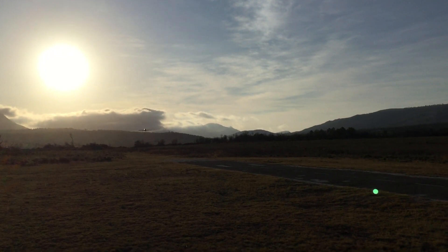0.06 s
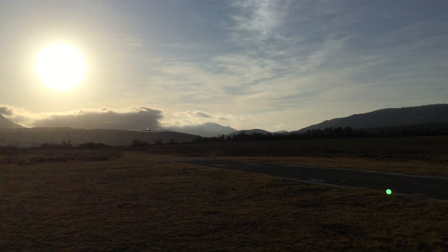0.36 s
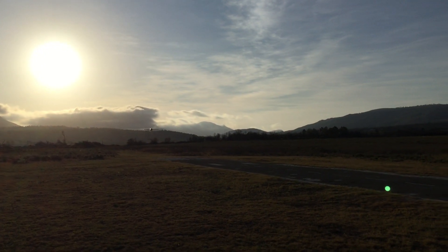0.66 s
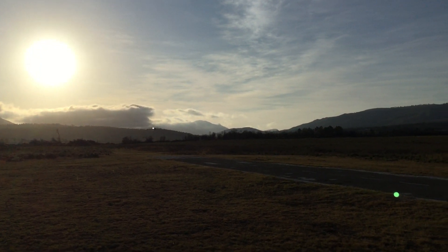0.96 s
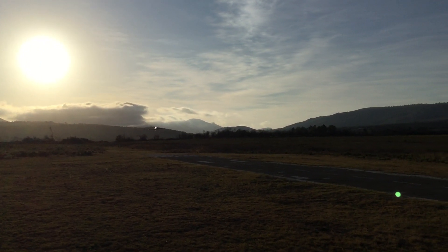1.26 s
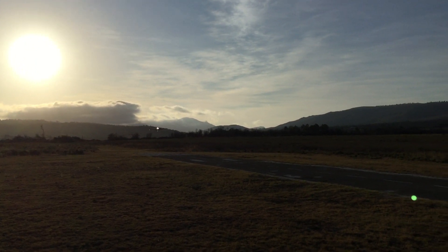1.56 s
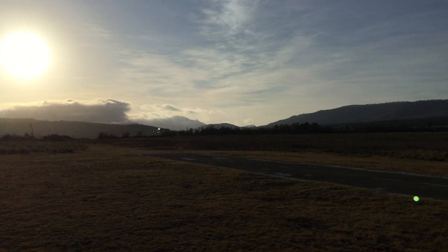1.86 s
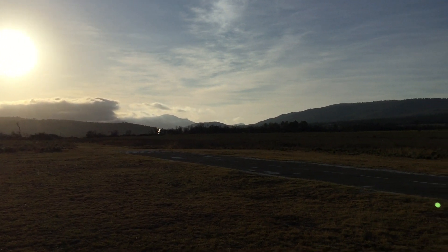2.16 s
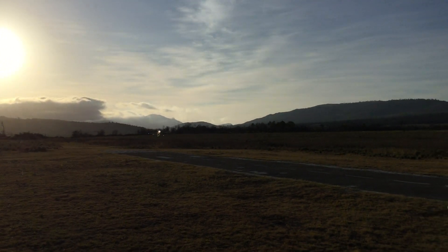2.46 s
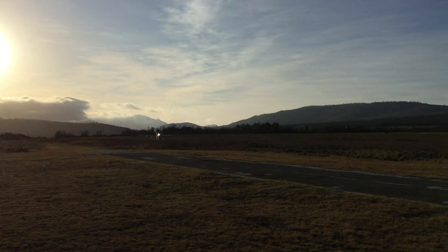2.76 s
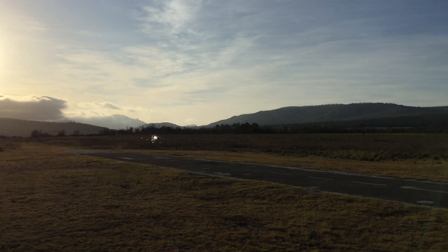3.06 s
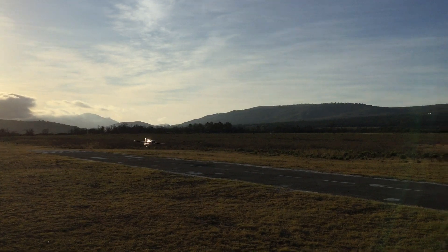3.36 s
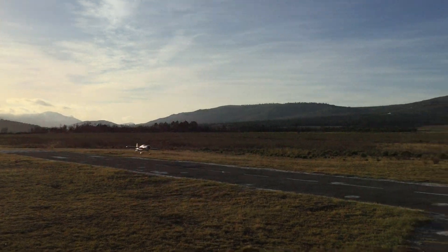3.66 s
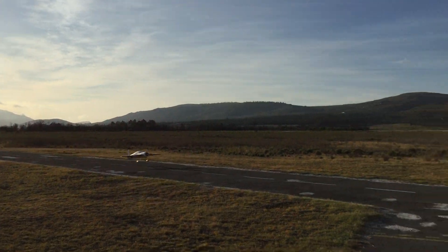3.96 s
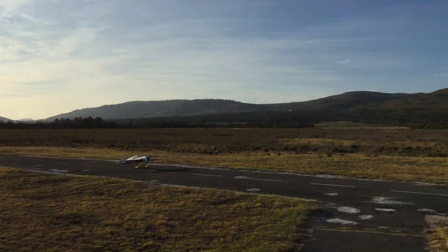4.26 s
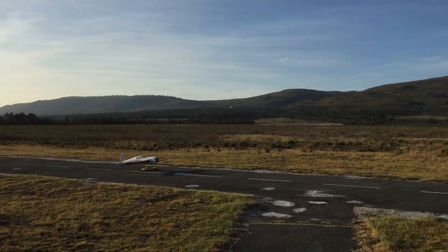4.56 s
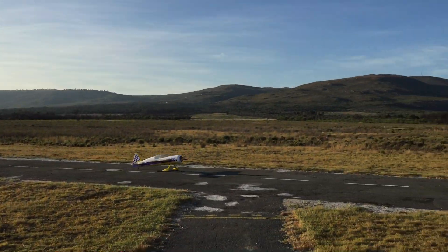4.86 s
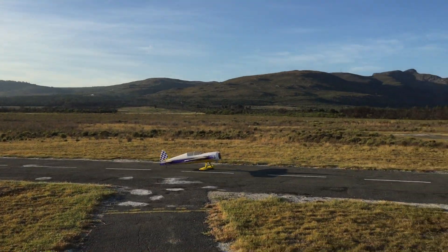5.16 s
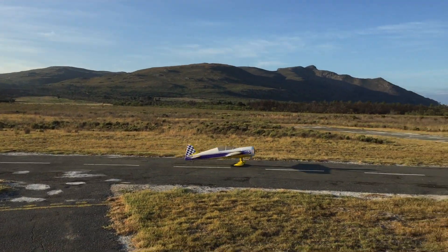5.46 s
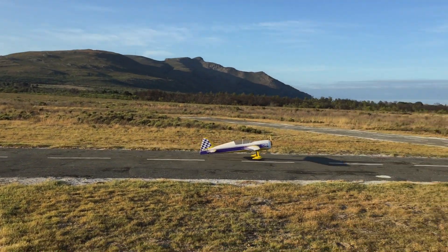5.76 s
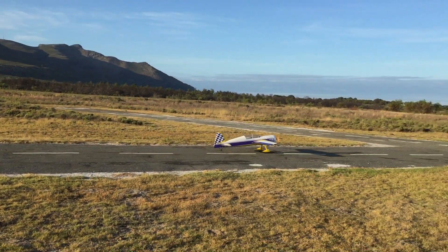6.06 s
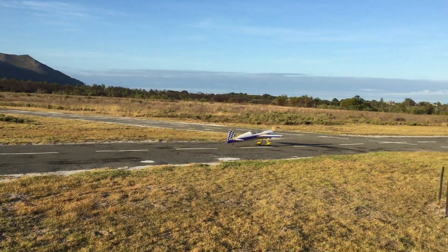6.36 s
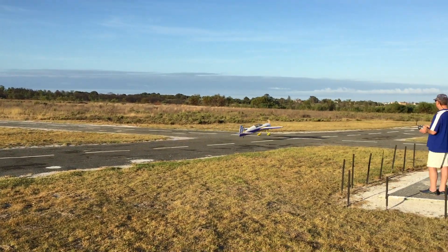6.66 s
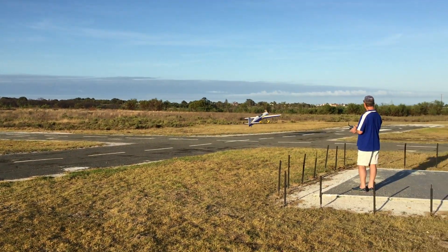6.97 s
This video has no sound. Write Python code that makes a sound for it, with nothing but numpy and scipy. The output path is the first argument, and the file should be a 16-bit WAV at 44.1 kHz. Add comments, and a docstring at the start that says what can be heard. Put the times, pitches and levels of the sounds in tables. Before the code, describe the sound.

A large model aeroplane glides in over an open airstrip, its two-stroke engine idling. At first it is fairly distant: a soft, rapid puffing, interrupted by irregular sharper pops with a tinny ring, over a faint propeller hiss. From about 2.5 seconds the idle slows a little and takes on a hollow knock, while the plane keeps getting closer and louder. The pops become crisper from around 3.5 seconds and are strong by 5. Small wheels rattle lightly on rough asphalt from about 5 seconds, fading after 6. At about 5.6 seconds the throttle opens and the sputter turns into a loud, raspy buzz that climbs steeply in pitch. The plane passes nearest the microphone just after 6 seconds. By 6.6 seconds the engine holds a steady high note, its tone shifting and wavering slightly as it begins climbing away, until about 7 seconds.

```python
"""A two-stroke engine puffs and barks at idle as a large model aeroplane glides in.
Most turns of the crank only puff through the silencer; a few fire hard. The plane skims the runway,
wheels rattling, passes the listener and opens up to climb away, firing on every turn.
The exhaust changes colour from nose-on to tail-on; the propeller's hiss is combed by its ground
reflection."""
import sys
import numpy as np
from scipy import signal
from scipy.fft import rfft, irfft
from scipy.io import wavfile
from scipy.ndimage import uniform_filter1d

SR = 44100
rng = np.random.default_rng(int(sys.argv[2]) if len(sys.argv) > 2 else 0)


def master(y):
    """Save y as 16-bit WAV."""
    cut = np.clip(np.atleast_2d(y).T, -1, 1)
    pcm = np.round(cut * 32767)  # scale
    wavfile.write(sys.argv[1], SR, pcm.astype(np.int16))


N = 317961
TIME = np.arange(N) / SR
THROTTLE_OPENS_S, SPOOL_S = 5.58, 0.3

# Each row: time in seconds, heard crank speed in Hz.
IDLE_SPEED = [(0.0, 44.9), (2.48, 43.5), (3.24, 37.9), (3.89, 38.0), (4.33, 35.5), (4.91, 35.0),
              (5.14, 35.3), (5.46, 41.0), (5.54, 41.3)]
POWER_SPEED = [(5.6, 49.8), (5.698, 58.3), (5.798, 67.5), (5.872, 71.1), (5.996, 75.3), (6.308, 84.1),
               (6.466, 100.2), (6.502, 103.7), (6.648, 109.9), (7.15, 110.2)]
def crank(bark_s):
    """Start and speed of each turn, the turns that bark, and the running turn count."""
    speed_hz, = curve(list(IDLE_SPEED) + list(POWER_SPEED), TIME)
    turns = np.cumsum(speed_hz) / SR
    # bend the count so each bark falls on a whole turn
    at_bark = np.interp(bark_s, TIME, turns)
    barking = np.cumsum(np.maximum(np.round(np.diff(at_bark, prepend=0)), 1))
    turns += np.interp(TIME, bark_s, barking - at_bark)
    times = np.interp(np.arange(int(turns[-1]) + 1), turns, TIME)
    return times, np.interp(times, TIME, speed_hz), barking.astype(int), turns


def idling(times, speed_hz, barking, idle_hz=39.75, eased_s=2.3):
    """Throttle shut: fresh charges pop, stale ones puff. Returns silencer drive and direct sound."""
    fresh_scatter, puff_scatter_db, chuff_scatter_db = scatter(times, .55, .8, 1.5)
    turn = np.arange(len(times))
    is_bark = np.isin(turn, barking)
    per_turn = np.sqrt(SR / speed_hz) * (times < THROTTLE_OPENS_S) * ~is_bark
    # burnt gas weakens the turn after a bark, the next is stronger; the seesaw dies away
    since_bark = turn - np.maximum.accumulate(is_bark * turn)
    fresh = (1 - 2 * (since_bark % 2)) * .8 ** (since_bark - 1.) + fresh_scatter
    eased = times > eased_s  # throttle eased back on the glide
    weak_db = -43 + spread_db(times) + 2.3851 * (speed_hz - idle_hz) - 3.5 * eased
    fire = per_turn * amp(weak_db + 2.4 * fresh)
    direct = puffs(times, per_turn * amp(puff_scatter_db), fresh)
    direct += chuffs(times, per_turn * amp(weak_db + chuff_scatter_db))
    direct += knocks(times, per_turn * eased, fresh)
    direct += can(times, fire * amp(-4.5))
    return band(pulses(times, fire), 1300, "low"), direct


# Each row: multiple of the puff pitch, decay in ms, level in dB.
PUFF_MODES = [(0.35, 3.2, -15), (1, 1.9, 0), (1.45, 2.8, -14)]
# Each row: time in seconds, pitch in Hz.
PUFF_PITCH = [(0.5, 160.6), (2.2, 175.7), (3.3, 219), (5.5, 225)]
# Each row: time in seconds, gain in dB.
PUFF_SWELL = [(0.8, -3), (1.7, 3), (2.8, 0.5), (3.7, 0.5), (4.9, -1), (5.4, -4)]
def puffs(times, sizes, fresh):
    """Unfired charges leave as round puffs that carry best abeam and thin as the engine picks up."""
    pitch_hz, = curve(PUFF_PITCH, times)
    swell_db, = curve(PUFF_SWELL, times)
    seesaw_db = 3.8 * np.interp(times, [2, 3.3], [.4, 1]) * fresh  # deeper at slow idle
    sizes = sizes * amp(-20.5 + spread_db(times, beaming=1.88) + swell_db - seesaw_db)
    return sum(rings(times + .0005, sizes * amp(db), ratio * pitch_hz, ms, order=3)
               for ratio, ms, db in PUFF_MODES)


# Each row: frequency in Hz, gain in dB.
CHUFF_COLOUR = [(350, -2), (520, 6), (900, -18), (1200, 0.5), (2000, -22)]
def chuffs(times, sizes):
    """The breathy edge of a puff carries only from close by."""
    level_db = -11.5 + np.interp(times, [1.5, 3.3, 4.6], [-8, 0, 5])
    breath = bursts(times, sizes * amp(level_db), rise_ms=.6, decay_ms=3.5)
    return coloured(breath, CHUFF_COLOUR, 560, 1000)


# Each row: frequency in Hz, gain in dB.
KNOCK_COLOUR = [(200, -8.5), (380, 0.5), (560, -1), (760, -15.5), (1300, -16), (2200, -24)]
def knocks(times, sizes, fresh):
    """At slow idle a fresh charge gives a hollow knock."""
    level_db = -32.5 + spread_db(times, beaming=1.46) + 4.9 * fresh
    strikes = pulses(times + .00093, sizes * amp(level_db))
    return -coloured(strikes, KNOCK_COLOUR, 300, 1000, bass_lag_ms=1.06)


# Each row: start in seconds, relative level in dB, extra crack and ping in dB.
BARKS = [(0.0197, -28.0, 0), (0.0412, -27.5, -2), (0.1064, -27.5, 3), (0.2395, -25.5, 0),
         (0.2835, -24.0, -1), (0.3714, -26.5, -3), (0.4154, -24.5, 0), (0.6357, -26.0, -1),
         (0.7923, -25.5, 1), (0.9943, -22.0, 2), (1.1288, -27.0, 2), (1.3118, -26.0, -2),
         (1.7416, -22.5, -2), (1.8085, -22.0, -2), (1.8752, -23.0, 1), (1.9659, -24.5, 1),
         (2.0571, -23.5, -1), (2.1248, -22.5, 2), (2.1929, -23.5, -1), (2.2611, -23.5, -2),
         (2.3291, -21.5, 5), (2.3975, -21.5, 0), (2.4665, -21.0, -2), (2.6046, -21.0, 1),
         (2.7229, -24.5, 0), (2.8939, -22.0, 1), (3.0953, -22.5, 3), (3.1998, -23.0, 1), (3.3058, -21.5, 2),
         (3.6238, -16.5, 4), (3.7551, -15.5, 2), (3.9915, -21.5, -7), (4.0988, -15.5, -1),
         (4.2905, -17.5, 1), (4.3748, -19.5, -1), (4.4867, -20.0, -4), (4.6014, -15.5, 4),
         (4.7173, -18.0, -1), (4.8042, -16.0, -1), (4.9824, -12.0, 2), (5.0991, -10.5, 0),
         (5.2116, -9.0, -3), (5.2655, -10.5, -2), (5.3182, -11.5, -1), (5.3955, -10.0, -1),
         (5.467, -14.0, 2), (5.5147, -10.5, 0), (5.5593, -8.5, 1), (5.6002, -9.0, 1), (5.6752, -9.0, -4),
         (5.8326, -9.5, 1), (5.9441, -7.5, 1), (6.0502, -12.5, 1), (6.1648, -9.5, 3)]
def barks(times):
    """A full charge fires. Returns a rough pulse as silencer drive, and the direct ping and gas crack."""
    _, level_db, sharp_db = np.transpose(BARKS)
    running_db = -9 * (times >= THROTTLE_OPENS_S)  # under throttle it only tops up a firing
    pulse_db = level_db + running_db
    crack_db = 4 + 1.61 * level_db + sharp_db + running_db / 3
    fire = amp(pulse_db + 12.5)
    tail = band(bursts(times, fire, rise_ms=1, decay_ms=14), 380, "high", order=1)
    gas = bursts(times + .00013, amp(crack_db), rise_ms=.5, decay_ms=2.6)
    cracks = coloured(gas, GAS_SIDE, 6000, 15000)
    # distant air dulls the cracks
    near = np.interp(TIME, [1.5, 3.3, 3.6], [.03, .2, .9])
    cracks = near * cracks + (1 - near) * amp(6) * band(cracks, 6500, "low")
    pings = can(times, amp(pulse_db + sharp_db + 13.5))
    return pulses(times, fire) + .27 * tail, pings + cracks


def throttled(times, speed_hz, barking, half_power_hz=82.7, misfire_db=-7, boom_db=.3):
    """Throttle open: every turn fires, more evenly at speed. Returns silencer drive and direct sound."""
    uneven = (60 / speed_hz) ** 2
    jitter_s, fire_scatter_db, gas_scatter_db = scatter(times, 1.5e-5, .9, 1.9)
    fired_s = times + uneven * jitter_s
    # the throttle leads the speed by the spool-up time
    lead_hz = SPOOL_S * uniform_filter1d(np.gradient(speed_hz, times), size=7)
    pull_hz = speed_hz + lead_hz - half_power_hz
    # a near misfire leaves its charge for the bark that follows
    misfires = np.isin(np.arange(len(times)), barking - 1)
    per_turn = np.sqrt(SR / speed_hz) * (times >= THROTTLE_OPENS_S) * amp(misfire_db * misfires)
    fire = per_turn * amp(-27.5 + .1348 * pull_hz + spread_db(times) + uneven * fire_scatter_db)
    pressure = pulses(fired_s, fire)
    boom = (amp(boom_db) - 1) * band(pressure, 230, "low", order=1)
    turbulence = band(bursts(fired_s, fire, rise_ms=.4, decay_ms=1.8), 2200, "high")
    gas = per_turn * amp(gas_scatter_db)
    jet_db = -38.5 + .0983 * pull_hz + spread_db(times, beaming=2.3)
    direct = gas_jet(fired_s, gas * amp(jet_db)) + shrill(fired_s + .00026, gas)
    return pressure + boom + .55 * turbulence, direct


# Each row: frequency in Hz, gain in dB.
EXHAUST_AHEAD = [(70, -10), (170, 12), (320, -13), (375, -2), (430, -5), (550, 8), (630, 7.5), (680, 5),
                 (725, 10.5), (800, -0.5), (980, 2), (1200, -7.5), (1700, -13), (2000, -17.5),
                 (2450, -24.5), (3000, -12), (3600, -27)]
EXHAUST_APPROACH = [(70, 1), (216, 7.5), (546, -3.5), (676, -7), (1260, -14), (1710, -10), (1940, 3.5),
                    (2330, -22.5), (2600, -30.5), (3380, -14), (4180, -21.5), (5000, -64)]
EXHAUST_ABEAM = [(50, -32), (72, 3.5), (102, 1), (150, 10.5), (230, 8), (330, 2.5), (430, 4), (560, -0.5),
                 (850, -3), (1150, -12), (1460, -39), (1900, -9), (2400, -31), (3400, -31), (4500, -38)]
# Each row: multiple of full crank speed, gain close by in dB, gain farther off in dB.
EXHAUST_ASTERN = [(1, 1.5, -1.5), (2, 2, -0.5), (3, -6, -8), (4, -29, -24.5), (5, -4, -9.5), (6, -12, -12),
                  (7, -7, -8), (8, -22.5, -21.5), (9, -1, -4.5), (10, -10, -15.5), (11, -6, -16),
                  (12, -18.5, -18)]
# Each row: multiple of full crank speed, gain in dB.
ASTERN_TREBLE = [(14, -37), (19.5, -20.5), (24, -23.5), (26.5, -27.5), (34, -28.5), (39, -33), (52, -42.5)]
# Times in seconds when one colour sounds alone: ahead, approach twice, abeam twice, close, farther off.
ASPECT_S = [1.7, 2.7, 3.7, 5.2, 6.3, 6.62, 7.051]
def exhaust(drive):
    """Pressure pulses ring the silencer, whose colour turns with the plane."""
    full_hz = POWER_SPEED[-1][1]
    treble = [(k * full_hz, db) for k, db in ASTERN_TREBLE]
    close = [(k * full_hz, db) for k, db, _ in EXHAUST_ASTERN] + treble
    farther = [(k * full_hz, db) for k, _, db in EXHAUST_ASTERN] + treble
    colours = EXHAUST_AHEAD, EXHAUST_APPROACH, EXHAUST_ABEAM, close, farther
    shares = np.repeat(np.eye(5), (1, 2, 2, 1, 1), axis=1)
    return -sum(coloured(drive * np.interp(TIME, ASPECT_S, share), colour, 400, 2500, bass_lag_ms=1.63)
                for colour, share in zip(colours, shares))


# Each row: frequency in Hz, gain in dB.
GAS_SIDE = [(1500, 3), (1850, 7), (2300, 3.5), (2650, 8.5), (3200, -1.5), (3950, 0.5), (4400, 3),
            (4880, -15), (5400, 1), (6900, -3), (7700, -5), (8400, 0), (10300, -15), (13700, -8),
            (16000, -15)]
GAS_ASTERN = [(1500, -13), (2400, 5), (3000, -1.5), (3700, 3), (4700, 3.5), (5700, 2.5), (7400, -3),
              (8900, 1.5), (10400, -9), (15000, -12)]
def gas_jet(times, sizes):
    """Gas jets out after each firing: a turbulent rush and a shock alike in every cycle."""
    rush = bursts(times + .0003, sizes, rise_ms=.45, decay_ms=1.3)
    shock = pulses(times + .0009, sizes)
    jet = .68 * (rush - shock)
    behind = np.interp(TIME, [6.3, 6.6], [0, 1])
    side = coloured(jet * (1 - behind), GAS_SIDE, 1500, 19000)
    return side + amp(1.5) * coloured(jet * behind, GAS_ASTERN, 2030, 19000)


# Each row: time in seconds, frequency in Hz, level in dB.
SHRILL_LOW = [(5.6, 1880, -40.5), (6.0, 1870, -35), (6.17, 1940, -33.5), (6.26, 2020, -30.5),
              (6.33, 2180, -34), (6.43, 2260, -34), (6.56, 2140, -31), (6.8, 2190, -37.5)]
SHRILL_MID = [(5.6, 3600, -45), (5.73, 3860, -44), (5.95, 3900, -55), (6.15, 3380, -42), (6.3, 3460, -40.5),
              (6.46, 3700, -37.5), (6.58, 3770, -52)]
SHRILL_HIGH = [(5.6, 4380, -53), (5.75, 4400, -45), (5.93, 4420, -40), (6.1, 4270, -63), (6.33, 4260, -53),
               (6.55, 4400, -71)]
def shrill(times, sizes):
    """Firings strike three silencer resonances, each beamed at the listener as the outlet swings past."""
    out = 0
    for track, decay_ms in (SHRILL_LOW, 2.0), (SHRILL_MID, 1.6), (SHRILL_HIGH, 1.9):
        hz, db = curve(track, times)
        detune, = scatter(times, .0028)
        out += rings(times, sizes * amp(db), hz * (1 + detune), decay_ms)
    return out


# Each row: frequency in Hz, decay in ms, level in dB.
CAN_MODES = [(1977, 3.2, -14.5), (2610, 2.6, -22), (3320, 5.3, -11.5), (4260, 2.4, -23.5)]
def can(times, sizes, abeam_db=-18):
    """Firings ping the metal silencer can, each in its own blend; it is weakest abeam."""
    heard = sizes * amp(abeam_db * nearness(times))
    out = 0
    for hz, decay_ms, db in CAN_MODES:
        detune, blend_db = scatter(times, .015, 2)
        out += rings(times + .000587, heard * amp(db + blend_db), hz * (1 + detune), decay_ms)
    return out


# Each row: frequency in Hz, gain in dB.
HISS_FAR = [(50, -11), (160, 13), (320, 3.5), (700, -6), (1450, -10.5), (1900, -9.5), (2800, -12),
            (4000, -16), (5000, -16), (6200, -12), (7200, -23), (11000, -40)]
HISS_NEAR = [(150, -6), (500, -9), (1000, -17.5), (1900, -17), (2400, -21), (3300, -21), (4700, -29),
             (5700, -24), (6900, -32), (11000, -47)]
# Each row: time in seconds, lag in ms, strength from 0 to 1.
GROUND_REFLECTION = [(0, .565, .85), (1, .535, .8), (2.2, .462, .72), (3.3, .405, .6), (4, .4, .12),
                     (7.2, .7, .35)]
def propeller(turns):
    """Blade turbulence, chopped twice a turn, heard directly and inverted off the ground."""
    chop = 1 + .22 * np.cos(2 * 2 * np.pi * turns)
    air = rng.standard_normal(N) * chop * amp(1.5 * walk(14))
    near = np.interp(TIME, [1.6, 4.2], [0, 1])
    hiss = (1 - near) * coloured(air, HISS_FAR, 1000, 7000) + near * coloured(air, HISS_NEAR, 1000, 7000)
    hiss *= amp(-36 + spread_db(TIME))
    lag_ms, strength = curve(GROUND_REFLECTION, TIME)
    reflection = uniform_filter1d(delayed(hiss, lag_ms), 5)  # grass scatters the treble
    combed = (hiss - strength * band(reflection, 240, "high", order=1)) / np.sqrt(1 + strength ** 2)
    throttle = np.clip((TIME - THROTTLE_OPENS_S) / SPOOL_S, 0, 1)
    fizz_gain = 2 * amp(-61.5 + spread_db(TIME, beaming=1.43) + 11 * throttle)
    return combed + fizz_gain * band(air, 10000, "high", order=4)


# Each row: time in seconds, gain in dB.
WHEEL_ROLL = [(5.02, -60), (5.12, -26.5), (5.72, -22), (6.4, -35)]
def wheels():
    """Small wheels rattle over rough asphalt as the plane skims the runway."""
    db, = curve(WHEEL_ROLL, TIME)
    return amp(db + 2 * walk(25)) * band(rng.standard_normal(N), (380, 1080), "band")


def ground_echoes(engine, lags_ms=(1.3, 2.4, 3.7, 5.6)):
    """Faint echoes come and go on the climb, so the overtones waver."""
    overtones = band(engine, 350, "high") * np.interp(TIME, [6.3, 6.6], [0, 1])
    return amp(-16.5) * sum(walk(7) * delayed(overtones, ms) for ms in lags_ms)


def nearness(t, speed_m_s=12.53, nearest_m=10.86, passes_s=6.24):
    """Nearest distance over present distance."""
    return nearest_m / np.hypot(nearest_m, speed_m_s * (t - passes_s))


def spread_db(t, beaming=1):
    """Level relative to the pass; a sound beamed sideways falls off faster."""
    return beaming * 20 * np.log10(nearness(t))


def amp(db):
    """Decibels to gain."""
    return 10 ** (np.asarray(db) / 20)


def curve(table, t):
    """A table's columns at times t."""
    seconds, *columns = np.transpose(table)
    return [np.interp(t, seconds, column) for column in columns]


def coloured(x, colour, lo_hz, hi_hz, bass_lag_ms=0):
    """Causal filter with the given spectrum and unit energy from lo_hz to hi_hz."""
    size = 4096
    f = np.maximum(np.fft.rfftfreq(size, 1 / SR), 1)
    hz, db = np.transpose(colour)
    octaves_outside = np.maximum(np.log2(hz[0] / f), 0) + np.maximum(np.log2(f / hz[-1]), 0)
    gain = amp(np.interp(np.log(f), np.log(hz), db) - 18 * np.minimum(octaves_outside, 4))
    # fold for minimum phase
    cepstrum = irfft(np.log(gain))
    cepstrum[1:size // 2] *= 2
    cepstrum[size // 2 + 1:] = 0
    delay_s = bass_lag_ms * 1e-3 / (1 + (f / 900) ** 2)
    ring = irfft(np.exp(rfft(cepstrum) - 2j * np.pi * np.cumsum(delay_s) * SR / size))
    energy = 2 * np.sum(gain[(f > lo_hz) & (f < hi_hz)] ** 2) / size
    return signal.fftconvolve(x, ring / np.sqrt(energy))[:N]


def band(x, hz, kind, order=2):
    """Low-, high- or band-pass."""
    return signal.sosfilt(signal.butter(order, hz, kind, fs=SR, output="sos"), x)


def delayed(x, ms):
    """Interpolated delay."""
    return np.interp(TIME - ms / 1000, TIME, x)


def pulses(times, sizes):
    """Impulses, each shared between two samples."""
    place = np.clip(times * SR, 0, N - 2)
    i = place.astype(int)
    return np.bincount(i, sizes * (1 - place + i), N) + np.bincount(i + 1, sizes * (place - i), N)


def bursts(times, sizes, rise_ms, decay_ms):
    """Rushes of turbulence, each with the energy of an impulse of its size."""
    ms = TIME[:2048] * 1000
    shape = (1 - np.exp(-ms / rise_ms)) * np.exp(-ms / decay_ms)
    envelope = signal.fftconvolve(pulses(times, sizes), shape / np.linalg.norm(shape))[:N]
    return envelope * rng.standard_normal(N)


def rings(times, sizes, hz, decay_ms, order=0):
    """Damped tones, each with the energy of an impulse of its size; higher orders swell first."""
    index = (times[:, None] * SR).astype(int) + np.arange(1, 1800)
    age_s = index / SR - times[:, None]
    tones = np.sin(2 * np.pi * hz[:, None] * age_s) * age_s ** order * np.exp(-age_s * 1e3 / decay_ms)
    tones *= sizes[:, None] / np.linalg.norm(tones, axis=1, keepdims=True)
    return np.bincount(index.ravel(), tones.ravel(), N)[:N]


def scatter(times, *spreads):
    """A random offset per event, one row for each spread."""
    return (rng.standard_normal((len(times), len(spreads))) * spreads).T


def walk(rate_hz):
    """Slow random drift, spread near 1."""
    step = int(SR / rate_hz)
    return uniform_filter1d(np.repeat(rng.standard_normal(N // step + 1), step), step)[:N]


def scene():
    """Engine and propeller on one shaft, wheels below."""
    times, speed_hz, barking, turns = crank(np.array(BARKS)[:, 0])
    port_opens_s = times + .003
    bark_drive, bark_direct = barks(port_opens_s[barking])
    idle_drive, idle_direct = idling(port_opens_s, speed_hz, barking)
    power_drive, power_direct = throttled(port_opens_s, speed_hz, barking)
    engine = exhaust(idle_drive + bark_drive + power_drive) + idle_direct + bark_direct + power_direct
    return (engine + ground_echoes(engine) + propeller(turns) + wheels())[None]


def record(dry, bottom_hz=55, top_hz=15900):
    """Thin the deep bass and cut the top treble."""
    thin = band(dry, bottom_hz, "high", order=3)
    return signal.sosfilt(signal.ellip(10, .2, 80, top_hz, fs=SR, output="sos"), thin)


dry = scene()
out = record(dry)
master(out)
```